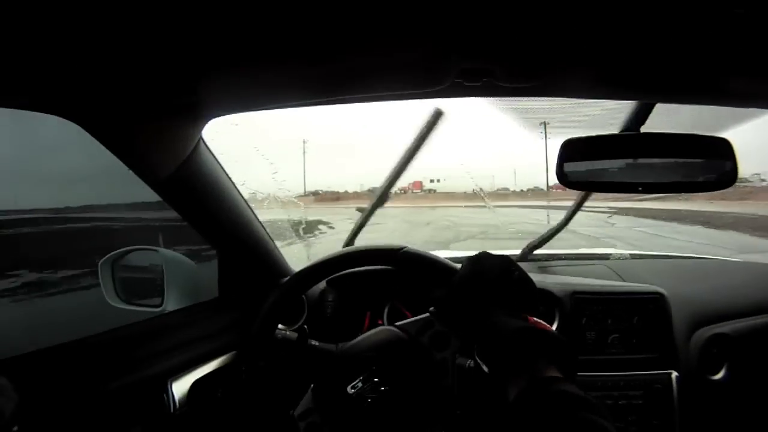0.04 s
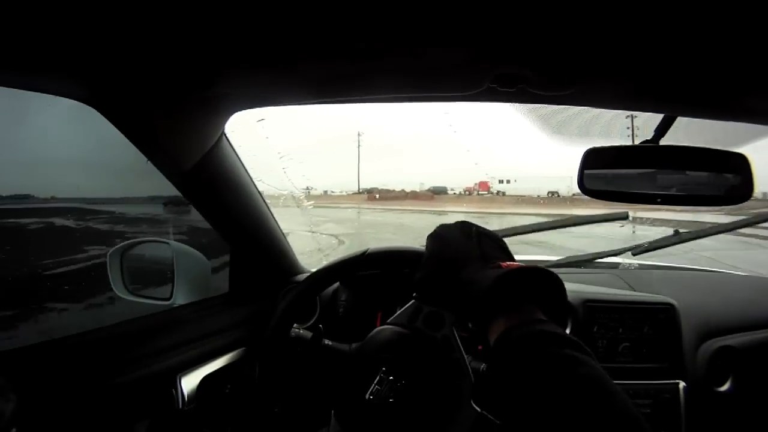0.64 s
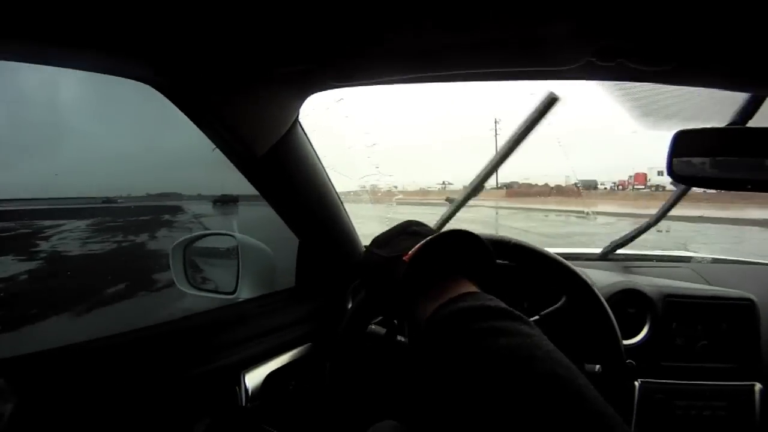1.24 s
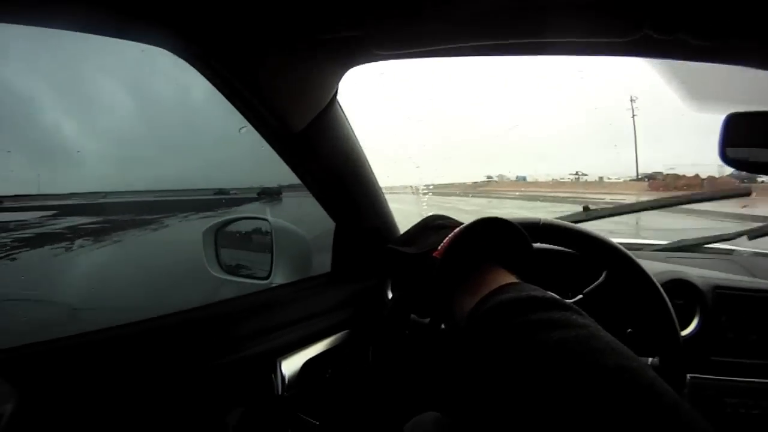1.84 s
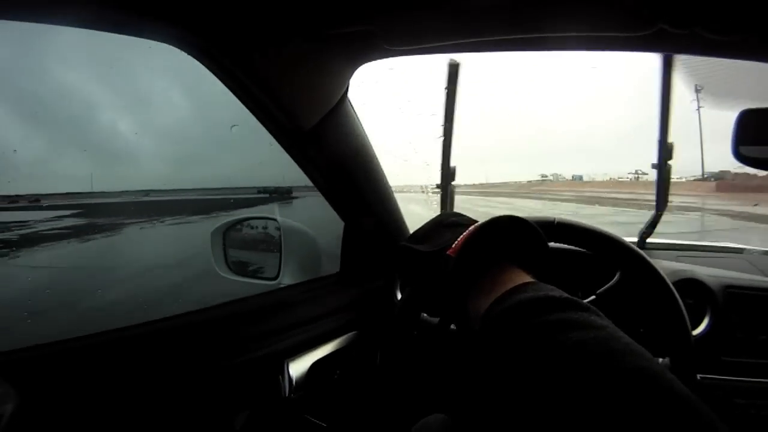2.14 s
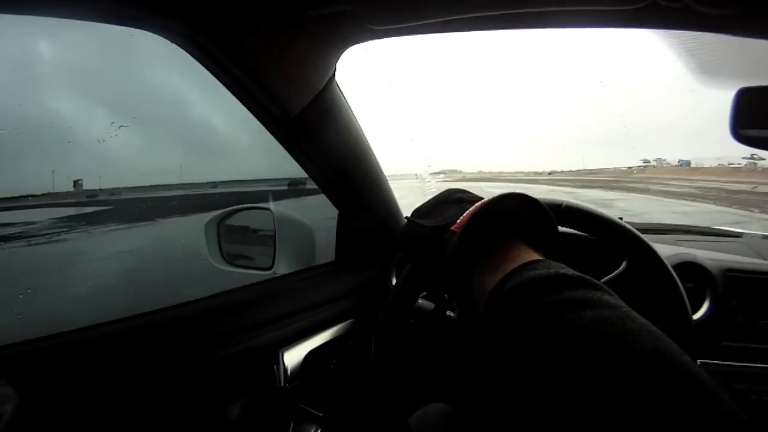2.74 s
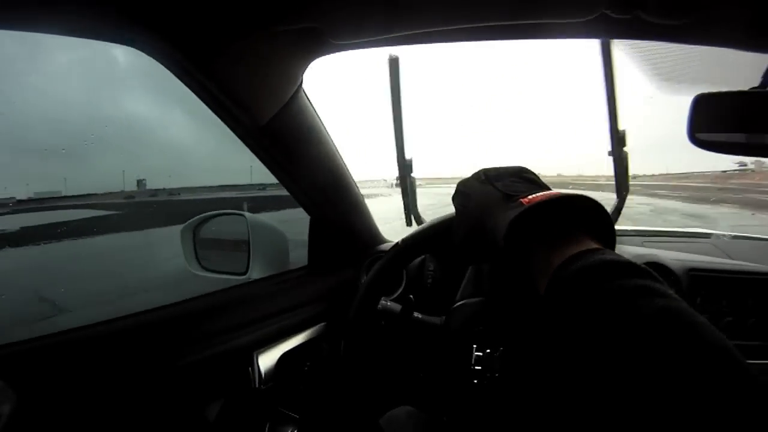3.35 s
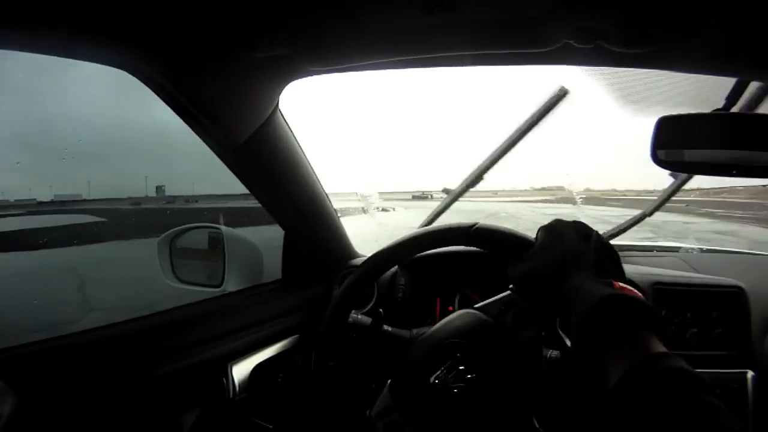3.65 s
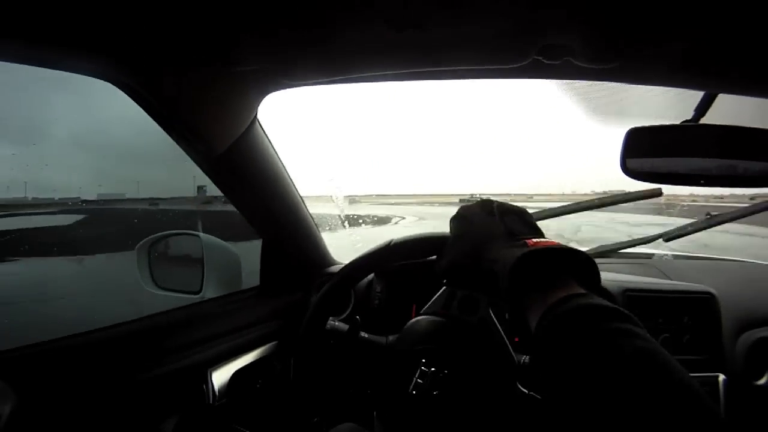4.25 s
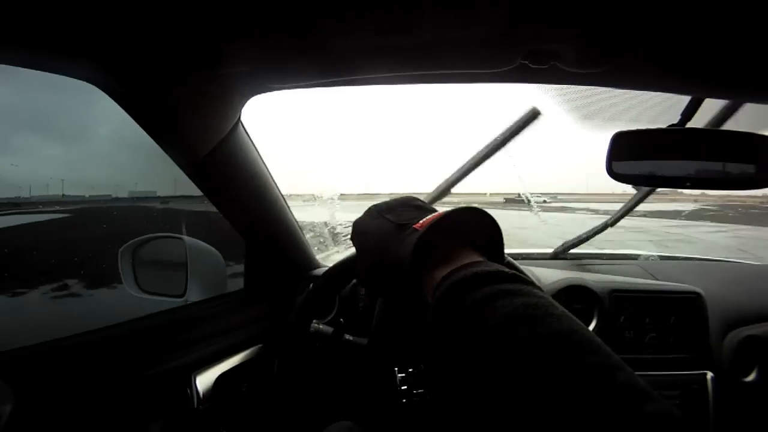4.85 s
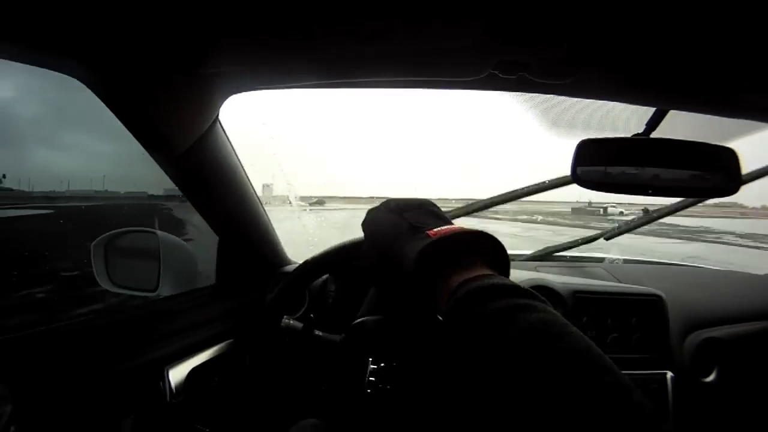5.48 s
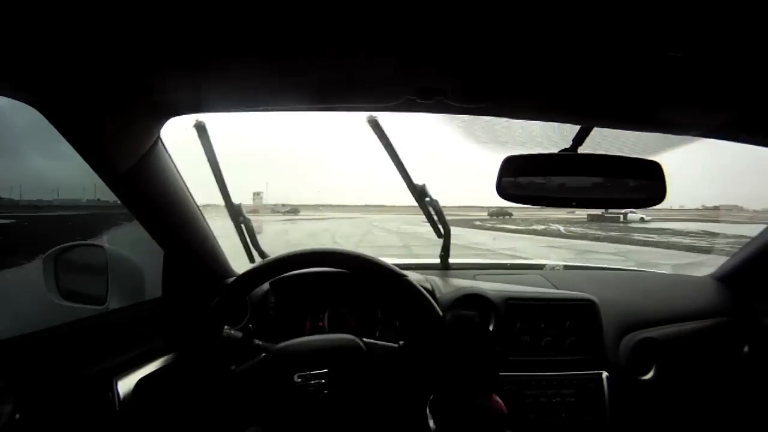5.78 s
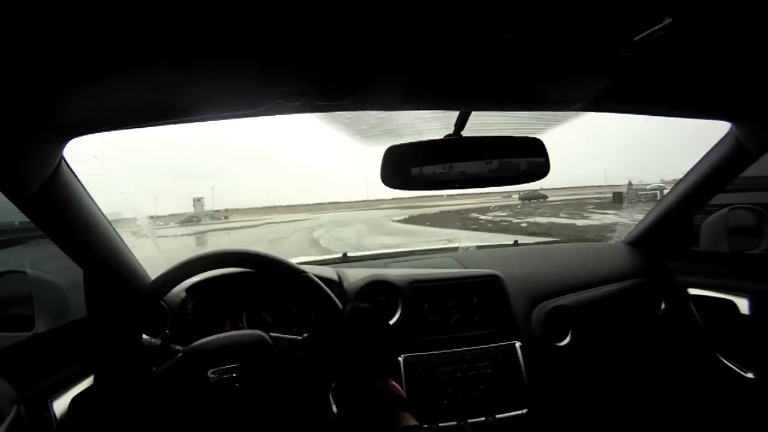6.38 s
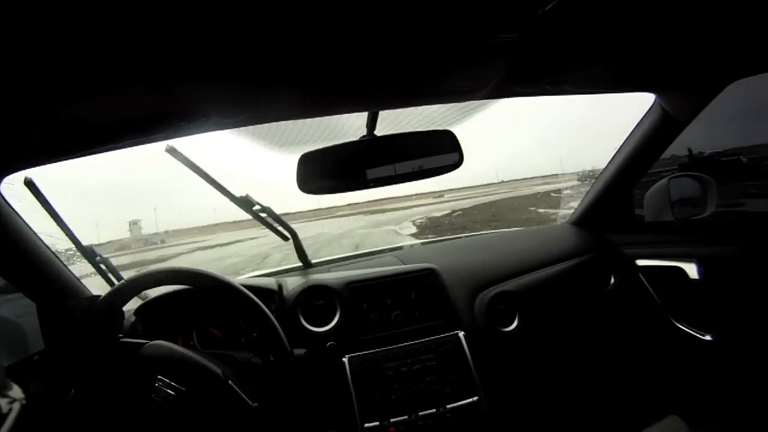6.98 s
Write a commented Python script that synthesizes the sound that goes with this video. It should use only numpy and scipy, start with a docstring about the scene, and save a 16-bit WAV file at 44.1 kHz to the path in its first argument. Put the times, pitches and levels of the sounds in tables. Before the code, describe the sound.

A car drives on a wet track, heard from inside: engine drone and tyre spray, with sharp knocks and rattling clicks up close.

```python
"""Car cabin on a wet track

A turbocharged six-cylinder car pulls through bends, heard by a camera in a closed plastic case. Engine orders
and gear whine follow the crank speed, over body rumble, tyre roar and spray. The case rattles on its mount:
knocks, taps, clinks and ticks excite the same modes of its shell; knocks, taps and ticks each weight them
differently, and clinks share the weighting of taps."""
import sys
import numpy as np
from scipy import signal
from scipy.fft import rfft, irfft
from scipy.io import wavfile
from scipy.ndimage import uniform_filter1d, minimum_filter1d

SR = 44100
rng = np.random.default_rng(int(sys.argv[2]) if len(sys.argv) > 2 else 0)


def bounce(signal):
    """Save signal as a 16-bit WAV file at the path given by the first command-line argument."""
    frames = np.transpose(np.atleast_2d(signal))
    limited = np.clip(frames, -1, 1)
    pcm = np.round(limited * 32767).astype(np.int16)
    wavfile.write(sys.argv[1], SR, pcm)


N = 318402
TIME = np.arange(N) / SR

# normal modes of the case: f/Hz, bandwidth/Hz, level/dB when knocked, when tapped, when ticked
CASE_MODES = [(388.6, 20.5, -1, 2, 3), (543.5, 59, -2.5, -6, -30), (612, 43, -2, 3.5, -7),
              (850, 41, -2, -0.5, -13), (992, 62, 2, 4.5, -2), (1168, 68, 0, 2, -1),
              (1232, 80, -2.5, 2.5, -1), (1410, 54, -10, -4.5, -21), (1580, 110, -3.5, -24.5, -3.5),
              (1905, 46, -24, -16.5, 2), (2072, 165, 2, -4.5, -17), (2386, 170, -6, -11, 0),
              (2990, 130, -1.5, -21, -4), (3670, 270, -0.5, -11, 1), (8400, 210, -10, -18.5, -7),
              (9960, 170, -2.5, -4.5, -7), (13300, 280, -11.5, -13.5, -18), (14020, 440, -2.5, -1, -6)]
# three ringing pitches of the clink, plus a broad, harsh edge near 3.6 kHz: f/Hz, bandwidth/Hz, level/dB
CLINK_PEAKS = [(2058, 88, 4), (3600, 850, -18), (9900, 66, 3.5), (14065, 75, 0)]


def engine(wobble=0.002, roughness=0.68, whine_roughness=0.76, gear_ratio=7.7):
    """Forced vibration: engine orders and gear whine are multiples of one firing rate, scaled by load."""
    # engine speed: t/s, firing rate/Hz
    revs = [(0, 131.2), (1.1, 129.9), (1.95, 123.9), (2.65, 125.5), (3.15, 134), (3.9, 155.4), (4.2, 156.5),
            (4.6, 163), (4.95, 164.8), (5.25, 162.3), (5.95, 177.6), (6.4, 175.3), (7.1, 163.6)]
    # throttle load: t/s, level/dB
    load = [(0, -4), (.5, -17), (1.1, -4), (1.7, -8.5), (1.95, -1.5), (3.15, 2), (3.9, -2), (4.55, -2.5),
            (4.85, -13), (5.25, -3.5), (5.6, 1.5), (6.3, -12), (7.22, -14)]
    # first two orders at full load, shaped by cabin resonances: f/Hz, level/dB
    cabin_response = [(122, -54.5), (134, -53.5), (150, -59.5), (180, -65.5), (255, -65), (295, -61),
                      (330, -52), (355, -57)]
    # brief exhaust howl: t/s, level/dB
    howl_levels = [(2.1, -72), (2.33, -57.5), (2.58, -57), (2.85, -76)]
    # gear whine against its pitch: f/Hz, relative level/dB
    whine_response = [(955, -63.5), (1000, -60.5), (1150, -62), (1290, -71)]
    # weaker orders: multiple of the firing rate, relative level/dB
    weak_orders = [(1.33, -62.5), (1.498, -68.5), (1.67, -62), (2.5, -73.5), (3, -70.5), (3.5, -63.5),
                   (4, -65.5), (4.5, -68), (4.998, -70.5), (6.001, -67)]
    firing_hz, load_db = curve(revs), curve(load)
    cycles = np.cumsum(firing_hz * (1 + wobble * drift(9.2))) / SR

    def partial(multiple, db, flutter):
        """Amplitude modulation: uneven combustion makes one order flutter about its rms level."""
        envelope = np.sqrt(2) * amp(db) * unit(1 + flutter * drift(11))
        return envelope * np.sin(2 * np.pi * (multiple * cycles + rng.random()))

    drone = sum(partial(k, load_db + level_at(cabin_response, k * firing_hz), .15) for k in (1, 2))
    howl = partial(4.5, curve(howl_levels), flutter=.4)
    whine_db = level_at(whine_response, gear_ratio * firing_hz) - 2 + 0.28 * load_db
    whine = partial(gear_ratio, whine_db, whine_roughness)
    growl = sum(partial(k, db - 6 + 0.26 * load_db, roughness) for k, db in weak_orders)
    return drone + howl + whine + growl


def rattle(blows, mode_db, part_peaks, chatter, chatter_s, treble_hz, lag_order, scatter_db=2.5):
    """Modal superposition: each blow rings the case and one attached part, heard through the wall."""
    # transmission through the case wall: f/Hz, gain/dB
    wall = [(150, -0.5), (330, 9), (2350, 6), (2600, -11), (3700, -16), (4100, -33.5), (7200, -39),
            (9000, -32), (14500, -38), (16000, -48.5)]
    size = 8192
    f, t = np.fft.rfftfreq(size, 1 / SR) + 1, np.arange(size) / SR
    modes = np.array(CASE_MODES)
    mode_power = resonance(f, modes[:, :1], modes[:, 1:2]) ** 2
    part = sum(amp(db) * resonance(f, hz, width) for hz, width, db in part_peaks)
    wall_db, octaves = level_at(wall, f), np.log2(f / 1000)
    share = chatter * f / (f + treble_hz)  # the faces chatter after contact, mostly in the treble
    fade = np.cos(np.pi / 2 * t / t[-1]) ** 2
    out = np.zeros(N)
    for s, db, tilt, part_db in blows:
        strength = amp(mode_db + scatter_db * rng.standard_normal(len(modes)))  # no two blows land alike
        shell = np.sqrt(strength ** 2 @ mode_power) * amp(db + wall_db + tilt * octaves)
        ring = rfft(minimum_phase(shell * np.hypot(1, amp(part_db) * part)))
        scrape = rng.standard_normal(size) * np.exp(-t / chatter_s)
        hit = ring * (1 + share * rfft(scrape) / np.linalg.norm(scrape)) / np.hypot(1, share)
        hit *= np.linalg.norm(ring) / np.linalg.norm(hit)  # chatter spreads a blow but keeps its energy
        add(out, s, fade * irfft(hit * wall_lag(f) ** lag_order))
    return out


def wall_lag(f, hz=1600, width_hz=1500):
    """Dispersion: bending waves cross the wall late in the middle band, so a click swells gradually."""
    detune = 1j * (f ** 2 - hz ** 2) / (f * width_hz)
    return (1 - detune) / (1 + detune)


def knocks(mode_db):
    """Impact excitation: heavy blows ring the shell and its hollow lid."""
    # heavy blows: t/s, level/dB, tilt/(dB per octave), lid ring/dB
    blows = [(.9212, 18, 2, -1.5), (.9280, 7, 3.5, 10.5), (1.1047, 7, 1.5, -11), (1.1112, -9.5, -5.5, 9),
             (3.2868, 7, 5, -3), (3.2899, 24, -2.5, -10.5), (3.2992, 9.5, 2.5, -12), (6.2738, 0.5, 1, 0),
             (6.2795, 8, 5, -8), (6.2830, 16.5, .5, 11.5), (6.3016, -2, 2.5, 9), (6.7445, 2.5, -3.5, 3.5),
             (6.7828, 11.5, 0, 10), (6.7880, -11, 6, 14)]
    # modes of the lid: f/Hz, bandwidth/Hz, level/dB
    lid_modes = [(987, 300, 1), (1270, 100, -23.5)]
    return rattle(blows, mode_db, lid_modes, chatter=1.35, chatter_s=0.0032, treble_hz=2395,
                  lag_order=3, scatter_db=1.85)


def taps(mode_db, tilt_db_per_octave=-0.4, hardening=0.34, ping_db=-5):
    """Contact stiffening: harder taps of the mount's joint are shorter, hence brighter."""
    # light contacts: t/s, level/dB
    contacts = [(3.3473, -10), (3.3571, -9), (3.4574, -6.5), (3.7463, 4.5), (3.9464, 2), (3.9972, -3),
                (4.1316, 5), (4.1733, -5.5), (4.2104, -5), (4.3201, -6.5), (4.374, -1.8), (4.4302, -7),
                (4.6328, -.5), (4.691, -11), (5.019, -5.5), (5.1419, 5), (5.1698, -10.5), (5.2035, -6.5),
                (5.3795, 4), (5.777, 1.5), (5.9388, -3.5), (6.23, -6)]
    blows = [(s, db, tilt_db_per_octave + hardening * db, ping_db) for s, db in contacts]
    return rattle(blows, mode_db, CLINK_PEAKS, chatter=1.0, chatter_s=0.0029, treble_hz=3500, lag_order=2)


def clinks(mode_db, tilt_db_per_octave=0.9):
    """Free vibration: a loose metal part of the mount strikes the case and pings."""
    # metal contacts: t/s, level/dB, ping/dB
    contacts = [(3.3217, -6, 5), (3.3356, -9, 8.5), (4.458, 3.5, 10.5), (4.9736, 2.5, 7.5),
                (5.7918, 1, 6.5), (6.3387, -0.5, 24), (6.367, -2.5, 15), (6.4383, -1.5, 24.5),
                (6.4557, -5.5, 8), (6.5041, -2, 21.5), (6.7104, -11.5, 5), (6.7423, 4.5, 16)]
    blows = [(s, db, tilt_db_per_octave, ping_db) for s, db, ping_db in contacts]
    return rattle(blows, mode_db, CLINK_PEAKS, chatter=0.92, chatter_s=0.0035, treble_hz=3500,
                  lag_order=3, scatter_db=0.5)


def ticks(mode_db, tilt_db_per_octave=2.5, hardening=.1, ping_db=4):
    """Point of excitation: leaning on its other side, the joint weights the modes differently."""
    # small contacts: t/s, level/dB; the faint first one is a splash of water striking the case
    contacts = [(1.471, -22), (2.2794, -2.5), (2.3277, -10), (2.367, -5.5), (2.5363, .8)]
    blows = [(s, db, tilt_db_per_octave + hardening * db, ping_db) for s, db in contacts]
    return rattle(blows, mode_db, CLINK_PEAKS, chatter=0.41, chatter_s=0.0041, treble_hz=3000,
                  lag_order=2)


def jolts(push_s=.0011, sway_hz=53, sway_t60_s=.5):
    """Damped oscillation: after a short push the camera sways and its bracket rings on."""
    # shocks to the mount: t/s, push/dB, sway/dB, bracket ring/dB
    shocks = [(-.03, -42, -34, -33), (0.9223, -41, -74, -33), (3.2923, -19.5, -43.5, -57),
              (6.2841, -30, -41, -42.5), (6.784, -15.5, -44, -34.5)]
    # modes of the bracket: f/Hz, level/dB, T60/s
    bracket_modes = [(376.7, 6.5, 0.13), (680, -1, 0.21), (1124, -18, 0.32)]
    t, out = np.arange(SR // 2) / SR, np.zeros(N)

    def damped(hz, t60):
        """Exponential decay: a sine that loses 60 dB in t60 seconds."""
        return np.sin(2 * np.pi * hz * t) * np.exp(-np.log(1000) * t / t60)

    push = t / push_s * np.exp(1 - t / push_s) * (1 - t / push_s / 2)
    sway = damped(sway_hz, sway_t60_s)
    ring = sum(amp(db) * damped(hz, t60) for hz, db, t60 in bracket_modes)
    for s, push_db, sway_db, ring_db in shocks:
        add(out, s, amp(push_db) * push + amp(sway_db) * sway + amp(ring_db) * ring)
    return out


def cracks(low_hz=3800, high_hz=7000, length_s=0.0023):
    """Band-limited transient: a brief, bright crack of noise on the hardest knocks."""
    # noise bursts: t/s, level before filtering/dB
    bursts = [(0.9208, -37.5), (3.2896, -26.5), (6.2836, -16.5)]
    bandpass = signal.butter(1, [low_hz, high_hz], "band", fs=SR, output="sos")
    lowpass = signal.butter(1, high_hz, fs=SR, output="sos")
    swell = signal.windows.hann(round(length_s * SR))
    out = np.zeros(N)
    for s, db in bursts:
        add(out, s, amp(db) * swell * rng.standard_normal(len(swell)))
    return signal.sosfilt(np.vstack([bandpass, lowpass]), out)


def rumble(smooth_db=-55.5, uneven_db=3.5, rise_s=0.036, fall_s=.08):
    """Random vibration of the body: each bump adds power quickly and the dampers dissipate it."""
    # body vibration: f/Hz, relative spectral level/dB
    spectrum = [(8.8, -35), (15, -9.5), (43, 5), (59, -3.5), (86, -6), (97, -12.5), (105, -9), (140, -37),
                (230, -120)]
    # bumps in the track: t/s, level over the steady rumble/dB
    bumps = [(1.49, 12.5), (2.0, 6.5), (2.22, 6.5), (2.38, 9.5), (2.53, 7), (2.78, 4), (3.02, 6.5),
             (3.33, 10), (4.33, 5), (4.49, 6.5), (5.19, 5), (6.31, 8.5), (6.8, 2)]
    power = np.ones(N)
    for s, db in bumps:
        distance = np.maximum((s - TIME) / rise_s, (TIME - s) / fall_s)
        power += (amp(db) * np.exp(-distance ** 2 / 2)) ** 2
    envelope = amp(smooth_db + uneven_db * drift(4.5)) * np.sqrt(power)
    return envelope * coloured(rng.standard_normal(N), spectrum)


def wet_tyres(spray_db=-14, flicker_db=2.2, drops_per_s=500, drop_share=0.15, enter_s=0.1, leave_s=0.05):
    """Rolling noise, and spray with the shot noise of drops on the wheel arches; puddles swell them."""
    # tyre roar: f/Hz, relative spectral level/dB
    roar_spectrum = [(53, -39.5), (90, -12), (129, -6), (194, -10.5), (253, -11.5), (306, -17), (339, -8),
                     (401, -12.5), (455, -12.5), (530, -11.5), (626, -11.5), (788, -14.5), (1130, -10.5),
                     (1310, -19.5), (1900, -29), (2470, -61), (4180, -120)]
    # spray: f/Hz, relative spectral level/dB
    spray_spectrum = [(1030, -24), (1750, -13), (1880, -18), (2010, 0.5), (2130, 1), (2600, -12.5),
                      (2800, -21), (3120, -16), (3550, -21), (4620, -36), (7810, -120)]
    # roar along the wet track: t/s, level/dB
    rolling_levels = [(0, -55), (1.1, -57.5), (1.9, -56.5), (2.6, -51), (3.45, -54.5), (3.8, -52),
                      (6.2, -52.5), (7.22, -55.5)]
    # standing water: t/s, duration/s, roar rise/dB, spray rise/dB
    puddles = [(0.088, 0.49, 4, 2), (1.195, 0.567, 6, 6), (2.204, 0.44, 1.5, 0), (4.884, 0.45, 3.5, 1.5)]
    roar_level = curve(rolling_levels)
    spray_level = roar_level + spray_db
    for start, length, roar_rise_db, spray_rise_db in puddles:
        depth = np.clip(np.minimum((TIME - start) / enter_s, (start + length - TIME) / leave_s), 0, 1)
        roar_level += roar_rise_db * depth
        spray_level += spray_rise_db * depth
    splash_db = flicker_db * drift(31)  # uneven standing water
    roar = amp(roar_level + 0.49 * splash_db) * coloured(rng.standard_normal(N), roar_spectrum)
    drops = (rng.random(N) < drops_per_s / SR) * rng.standard_normal(N)
    water = rng.standard_normal(N) + drop_share * unit(drops)
    return roar + amp(spray_level + splash_db) * coloured(water, spray_spectrum)


def scrub(hz=1125, width_hz=70):
    """Stick-slip friction: tread blocks sing faintly in a narrow band of noise."""
    # scrub through the bends: t/s, level/dB
    levels = [(0, -68), (2.5, -69.5), (3.25, -56), (4.2, -69.5), (5.3, -61), (6.2, -56), (6.45, -66.5),
              (7.22, -72.5)]
    band = resonance(np.fft.rfftfreq(N, 1 / SR), hz, width_hz) ** 2
    return amp(curve(levels)) * unit(irfft(rfft(rng.standard_normal(N)) * band, N))


def amp(db):
    """Amplitude ratio of a level in decibels."""
    return 10 ** (np.asarray(db) / 20)


def unit(x):
    """Normalisation to rms 1."""
    return x / np.sqrt(np.mean(x ** 2) + 1e-20)


def level_at(spectrum, hz):
    """Interpolation of levels on a log-frequency axis."""
    f, db = np.transpose(spectrum)
    return np.interp(np.log(hz + 1), np.log(f + 1), db)


def curve(points):
    """Linear interpolation of (t/s, value) points over the scene."""
    return np.interp(TIME, *np.transpose(points))


def add(mix, s, sound):
    """Superposition of a sound on the mix from time s."""
    start = round(s * SR)
    sound = sound[max(-start, 0):]
    part = mix[max(start, 0):][:len(sound)]
    part += sound[:len(part)]


def drift(rate_hz):
    """Slow random fluctuation: low-pass noise of rms 1."""
    f = np.fft.rfftfreq(N, 1 / SR)
    return unit(irfft(rfft(rng.standard_normal(N)) / (1 + (f / rate_hz) ** 2), N))


def coloured(x, spectrum):
    """Spectral shaping to rms 1, with a steep roll-off beyond the ends of the spectrum."""
    f = np.fft.rfftfreq(N, 1 / SR) + 1
    outside = np.maximum(np.maximum(f / spectrum[-1][0], spectrum[0][0] / f), 1)
    return unit(irfft(rfft(x) * amp(level_at(spectrum, f)) / outside ** 4, N))


def resonance(f, hz, width_hz):
    """Magnitude response of one resonator, 1 at its centre."""
    return 1 / np.hypot(1, 2 * (f - hz) / width_hz)


def minimum_phase(gain):
    """Causality: the most compact impulse response with this magnitude spectrum."""
    log_gain = np.log(np.maximum(np.r_[gain, gain[-2:0:-1]], 1e-5))
    return np.fft.ifft(np.exp(np.conj(signal.hilbert(log_gain)))).real


def scene(hiss_db=-97):
    """Superposition of the cabin's drone, the rattling case and a very faint, steady hiss."""
    _, _, knocked, tapped, ticked = np.transpose(CASE_MODES)
    case = knocks(knocked) + taps(tapped) + clinks(tapped) + ticks(ticked)
    cabin = engine() + rumble() + wet_tyres() + scrub()
    return (cabin + case + jolts() + cracks() + amp(hiss_db) * rng.standard_normal(N))[None]


def record(dry, ceiling=.97, window=31, cutoff_hz=15400):
    """Peak limiting holds the hardest knocks under full scale; a low-pass filter limits the band."""
    gain = 1 / np.maximum(abs(dry) / ceiling, 1)
    limited = dry * uniform_filter1d(minimum_filter1d(gain, window), window)
    lowpass = signal.firwin(511, cutoff_hz, window=("kaiser", 9), fs=SR)
    return signal.oaconvolve(limited, lowpass[None], "same")


dry = scene()
out = record(dry)
bounce(out)
```